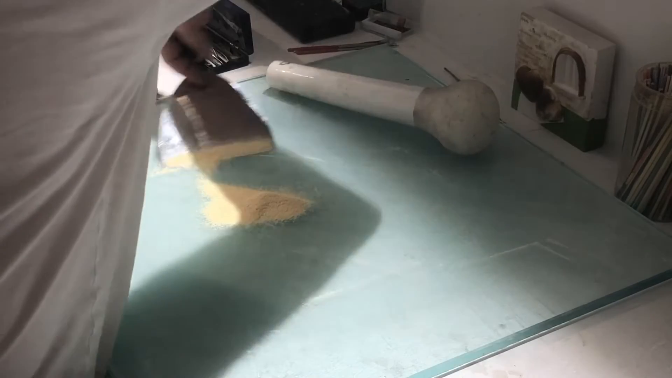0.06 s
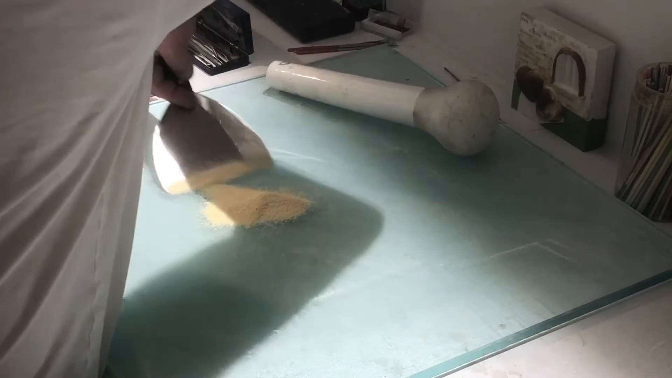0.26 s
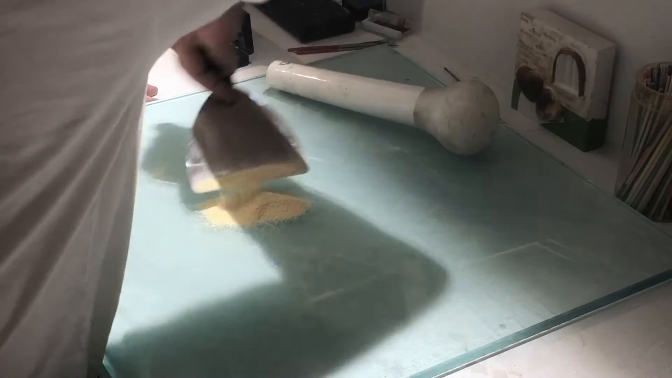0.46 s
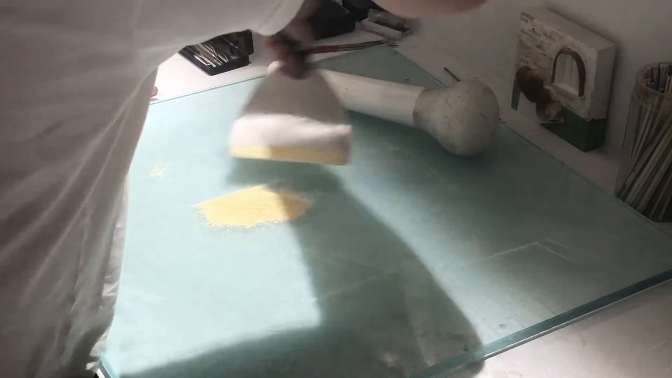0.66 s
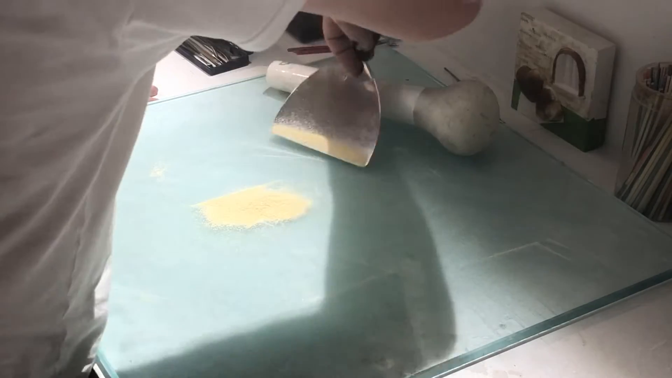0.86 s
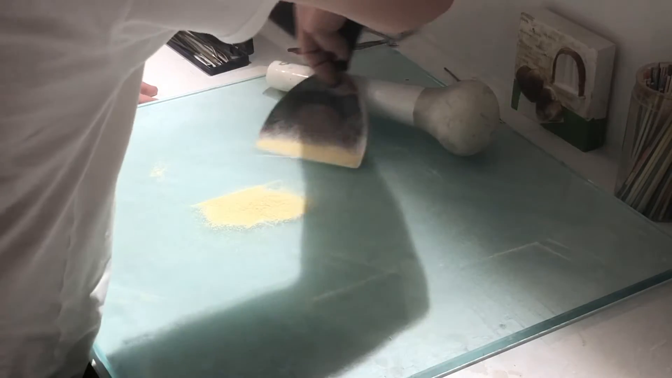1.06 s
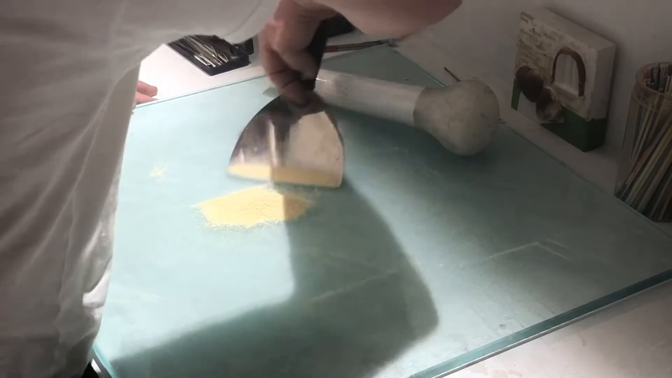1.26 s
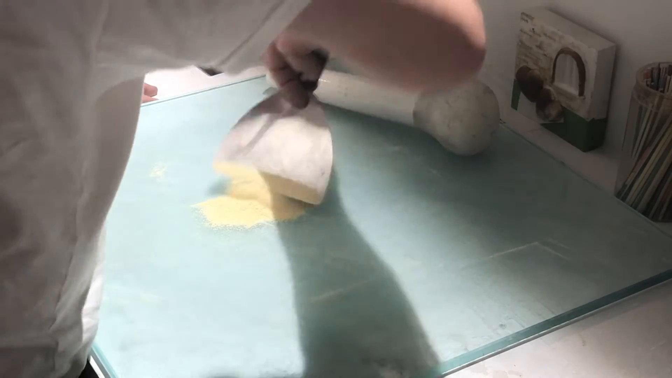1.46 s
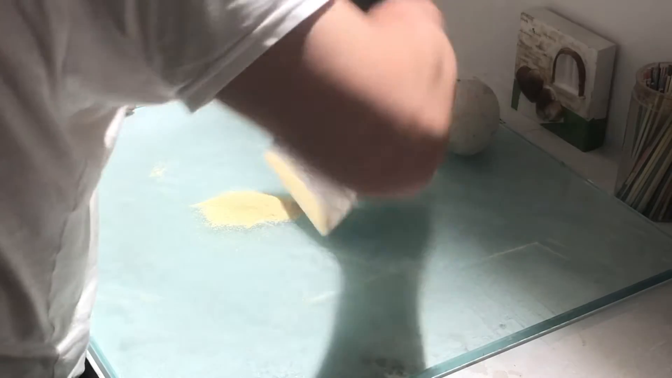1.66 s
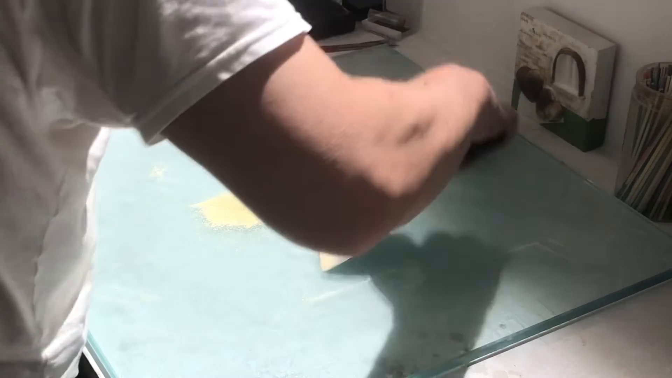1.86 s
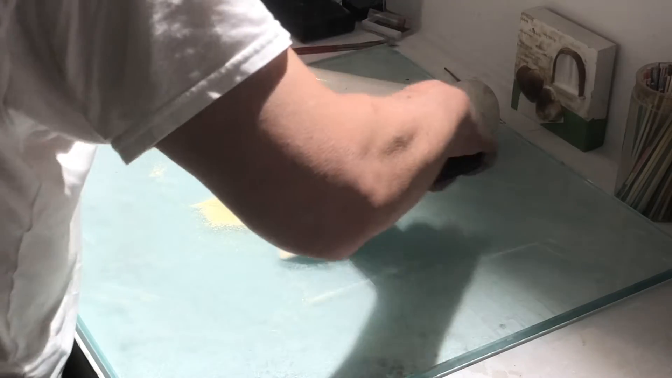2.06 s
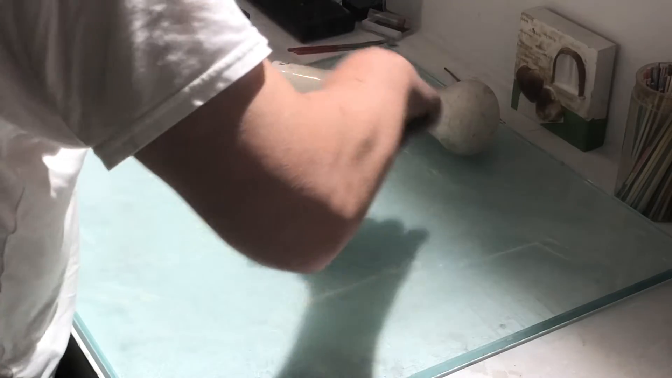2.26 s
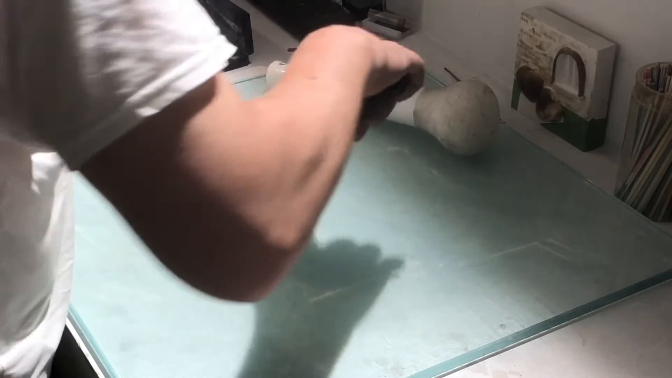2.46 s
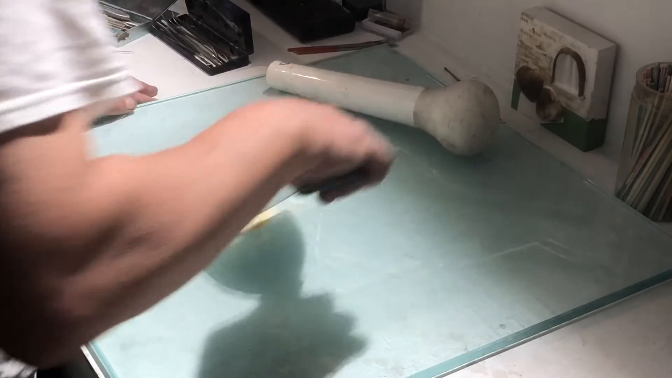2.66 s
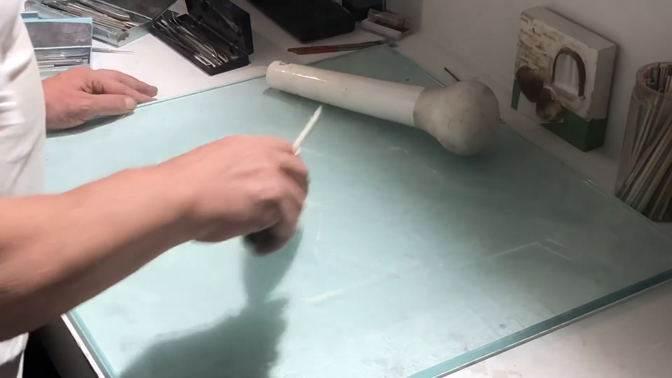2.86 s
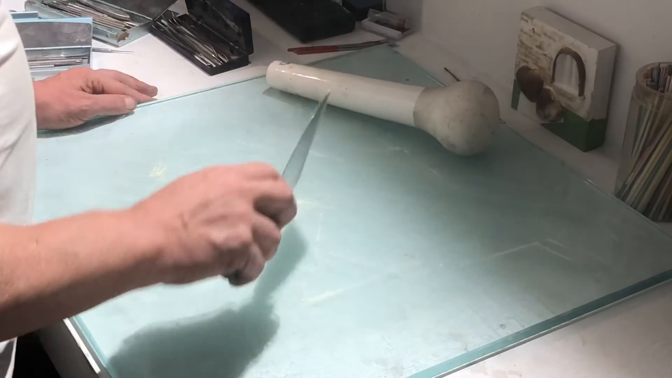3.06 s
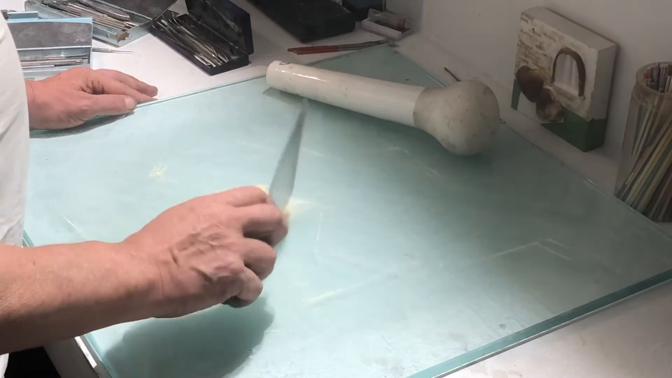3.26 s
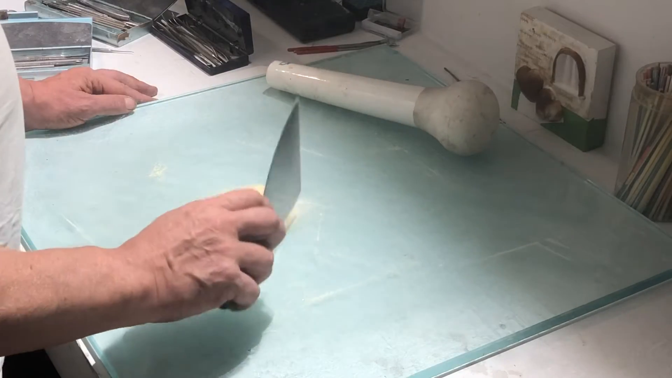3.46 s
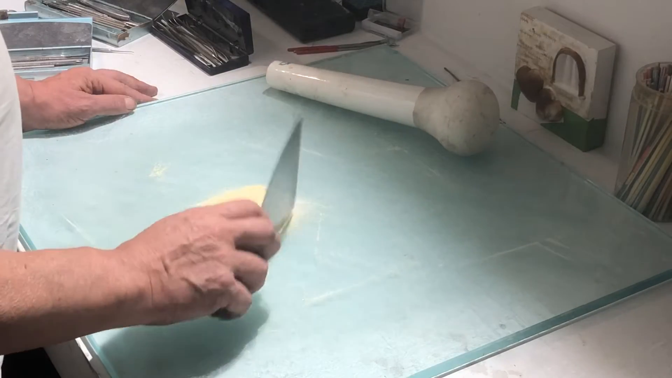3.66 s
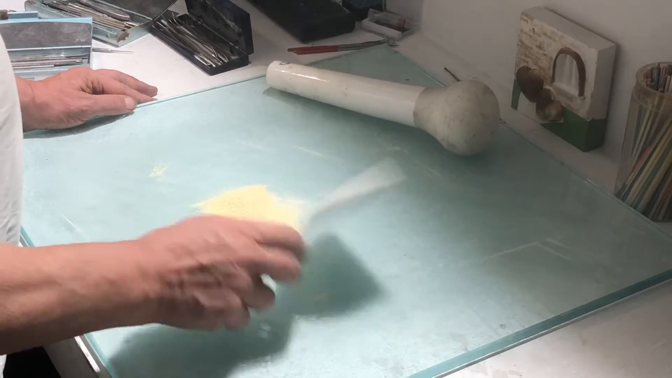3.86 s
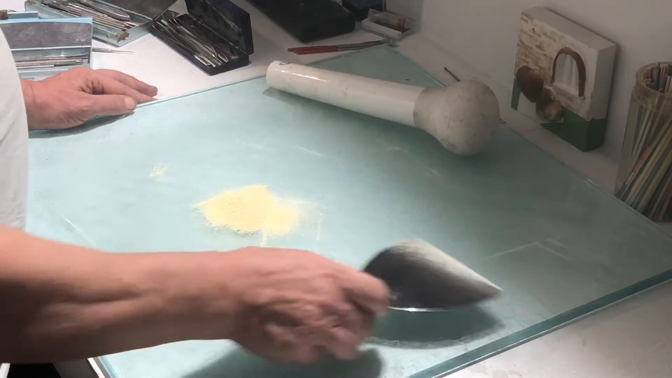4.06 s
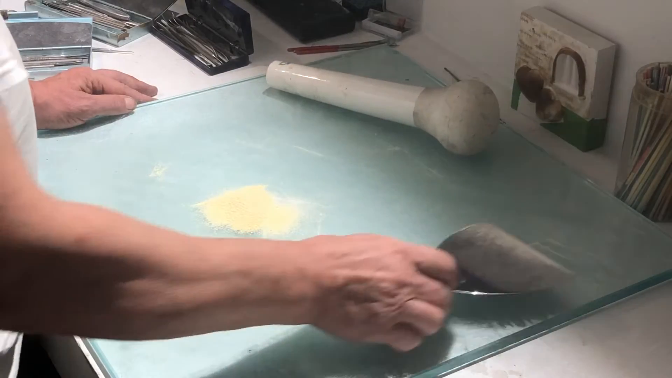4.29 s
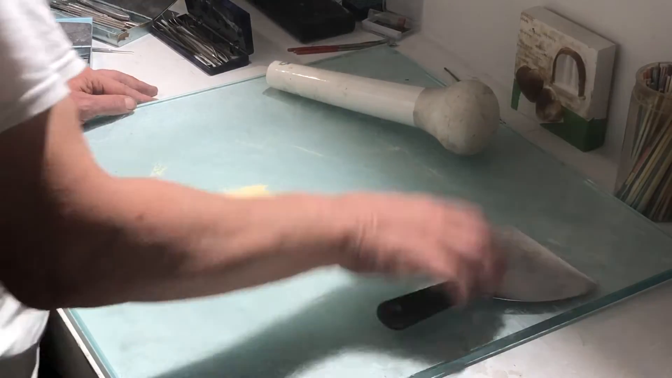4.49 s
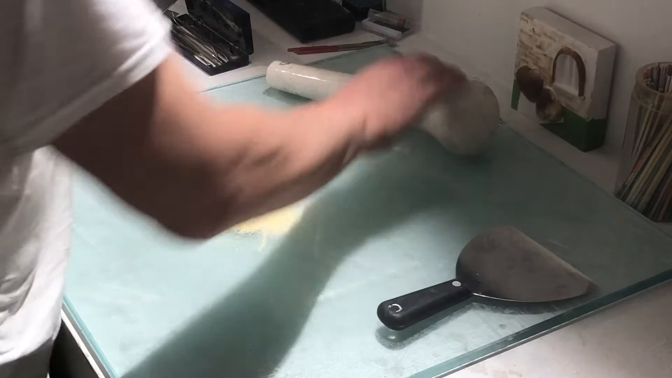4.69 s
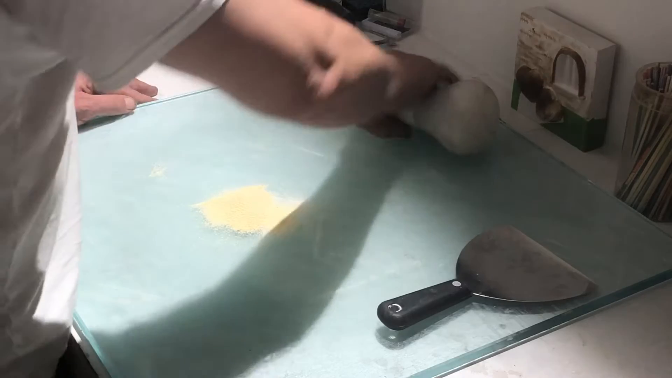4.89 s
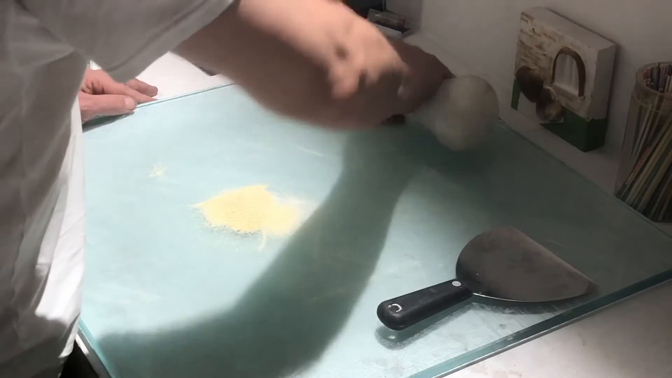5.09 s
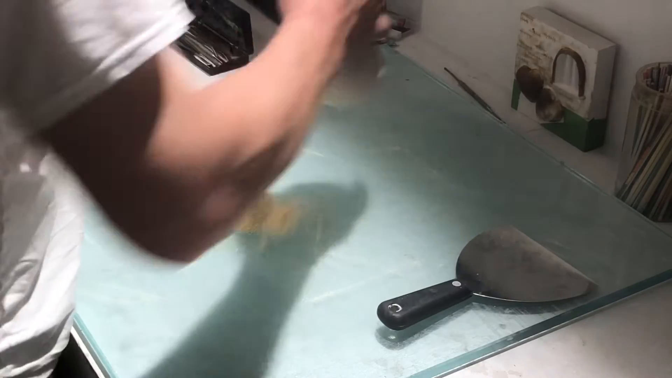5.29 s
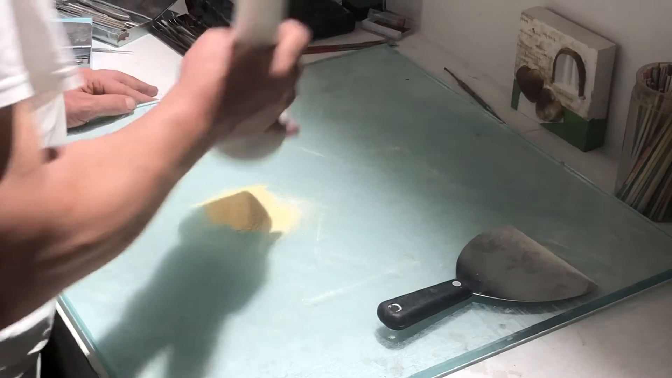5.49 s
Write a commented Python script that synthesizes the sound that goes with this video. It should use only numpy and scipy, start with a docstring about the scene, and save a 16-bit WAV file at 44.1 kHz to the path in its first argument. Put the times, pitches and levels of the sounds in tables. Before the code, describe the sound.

A steel scraper hisses powder across a glass slab in soft strokes, knocks sharply on it, then clatters down flat in a small humming room.

```python
"""Scraping powder on a glass slab

A steel scraper sweeps powder into a heap on a glass slab, in a small room with a fan running.
Its edge is tapped once and knocked twice to shed the powder; it is then laid flat with a short
clatter, and a pestle is lifted off with a soft bump. Fan and powder are coloured noise, the fan
with added tones. Glass, desk and steel are sets of fading sine tones, the glass and steel with
short noise bursts as well; the room adds a fading noise tail.
"""
import sys
import numpy as np
from scipy import signal
from scipy.fft import rfft, irfft, next_fast_len
from scipy.io import wavfile
from scipy.ndimage import map_coordinates

SR = 44100
rng = np.random.default_rng(int(sys.argv[2]) if len(sys.argv) > 2 else 0)


def file_out(sig):
    """Save sig as 16-bit WAV at sys.argv[1]."""
    # one column per channel
    cols = np.atleast_2d(sig).T
    # limit, then scale
    lim = np.clip(cols, -1, 1)
    pcm = np.round(lim * 32767).astype(np.int16)
    wavfile.write(sys.argv[1], SR, pcm)


N = 243873  # length of the scene in samples
T = np.arange(SR * 3 // 5) / SR  # time within one struck sound, in seconds


def amp(db):
    """Turn decibels into a gain."""
    return 10 ** (np.asarray(db) / 20)


def unit(x):
    """Scale a sound to rms 1."""
    return x / np.sqrt(np.mean(x ** 2) + 1e-20)


def along(points, hz):
    """Read (f/Hz, value) points at any frequency, with straight lines on a log axis."""
    point_hz, value = np.transpose(points)
    return np.interp(np.log(hz + 1), np.log(point_hz + 1), value)


def fade(t, t60):
    """Free decay: the sound falls 60 dB in t60 seconds."""
    return np.exp(-np.log(1000) * t / t60)


def rise_from_zero(rise_s):
    """A soft start: the sound grows smoothly instead of jumping in."""
    return 1 - np.exp(-T / rise_s)


def wobble(rate):
    """A smooth random curve through `rate` random points a second."""
    points = rng.standard_normal(int(N * rate / SR) + 4)
    return map_coordinates(points, [np.arange(N) * rate / SR])


def filtered(x, response):
    """Multiply the spectrum of x by a response of frequency."""
    size = next_fast_len(len(x) + SR // 4)
    spectrum = rfft(x, size) * response(np.fft.rfftfreq(size, 1 / SR))
    return irfft(spectrum, size)[:len(x)]


def noise(spectrum, size):
    """Noise of rms 1 with the given colour."""
    return unit(filtered(rng.standard_normal(size), lambda hz: amp(along(spectrum, hz))))


def add(track, s, sound):
    """Mix a sound into the track at time s."""
    part = track[round(s * SR):][:len(sound)]
    part += sound[:len(part)]


def ring(modes, scatter_db):
    """Tones of a struck body, set off together and fading, each at a slightly new strength."""
    hz, db, t60 = np.transpose(modes)[:, :, None]
    strength = amp(db + scatter_db * rng.standard_normal(hz.shape))
    return np.sum(strength * fade(T, t60) * np.sin(2 * np.pi * hz * T), axis=0)


def wash(spectrum, t60, rise):
    """The crowd of weak plate modes: it swells as bending waves spread, and dies fast."""
    return noise(spectrum, len(T)) * fade(T, t60) * rise_from_zero(rise)


# colour of the room's air noise: (f/Hz, relative level per Hz/dB)
AIR_COLOUR = [(15, -5), (33, -0.5), (75, -5.5), (125, -8), (175, -16.5), (240, -11.5), (400, -13.5),
              (560, -6), (800, -7), (1150, -11.5), (2600, -12.5), (3900, -21.5), (6000, -23.5), (8000, -31),
              (13000, -35), (15500, -40)]
# fan tones: (f/Hz, typical level/dB)
FAN_TONES = [(77, -82), (120, -80), (307, -85.5), (560, -83), (695, -83.5), (770, -79), (1594, -76)]


def fan():
    """Steady air noise with a few tones, slightly unsteady in level and phase."""
    t = np.arange(N) / SR
    tones = np.zeros(N)
    for hz, db in FAN_TONES:
        level = amp(db + 1.7 * wobble(3.93)) * np.sqrt(2)  # sqrt(2): dB counts rms, not peak
        tones += level * np.sin(2 * np.pi * hz * t + 0.84 * wobble(6.3))
    return amp(-64.0) * noise(AIR_COLOUR, N) + tones


# how long the room rings: (f/Hz, t60/s)
ROOM_DECAY = [(100, 0.42), (700, 0.61), (2500, 0.45), (6000, 0.43), (10000, 0.26), (15000, .2)]


def room_tail(spectrum):
    """Diffuse sound of the given colour: walls answer after a few milliseconds, treble dies early."""
    hz, t, z = signal.stft(noise(spectrum, len(T)), SR, nperseg=256)
    fading = z * fade(t, along(ROOM_DECAY, hz)[:, None])
    tail = signal.istft(fading, SR, nperseg=256)[1][:len(T)]
    return tail * (1 - np.exp(-(T / 0.0044) ** 2))


def room(x):
    """The room's answer to a small source: the sound smeared by an evenly coloured tail."""
    tail = room_tail([(1, 0)])
    return signal.fftconvolve(x, tail / np.linalg.norm(tail))[:N]


# tones of the desk: (f/Hz, relative level/dB, t60/s)
DESK_MODES = [(47.8, -14, 0.11), (75, -2, 0.22), (136.4, -4, 0.068), (174.5, 1.5, 0.054), (217.7, 2, 0.12),
              (246, 3.5, 0.095), (352.6, 4.5, 0.055)]


def desk():
    """The low thud of the desk under the slab."""
    return ring(DESK_MODES, scatter_db=.5) * rise_from_zero(.003)


def soft_thud(soft_hz):
    """A slow contact stirs only the lowest modes of the desk."""
    return signal.sosfilt(signal.butter(4, soft_hz, fs=SR, output="sos"), desk())


# the slab's strongest bending modes: (f/Hz, relative level/dB, t60/s)
GLASS_MODES = [(641.6, -11.5, 0.15), (988, -10.5, 0.073), (1216, -10, 0.051), (1624, -4.5, 0.037),
               (1649, 3, 0.04), (1798, -1.5, 0.074), (1998, -1, 0.07), (2017, -10.5, 0.055),
               (2370, 2.5, 0.026), (2376, 5.5, 0.017), (2560, -5.5, 0.036), (2830, 2, 0.038),
               (2997, -9, 0.085), (3210, -23.5, 0.069), (3244, 2.5, 0.033), (3530, 1.5, 0.051),
               (3665, 2.5, 0.04), (4140, -14, 0.084), (4200, -4.5, 0.077), (4340, 1.5, 0.057),
               (4530, -1.5, 0.073), (5000, -10, 0.072), (5420, -5, 0.065), (5850, -1, 0.081),
               (6550, -18.5, 0.12), (7000, -14, 0.2), (7300, -12.5, 0.065), (7680, -12, 0.06),
               (8580, -25, 0.064), (8790, -15, 0.083)]
# the crowd of weak modes of the glass: (f/Hz, relative level per Hz/dB)
GLASS_WASH_COLOUR = [(60, -15), (200, -13.5), (500, -16.5), (700, 0), (1400, -4), (2300, 4.5), (4500, 1),
                     (6200, -3), (8500, -5), (11000, -12.5), (15500, -39.5)]


def glass():
    """The slab, damped by the desk it lies on: strong tones plus a wash of weak ones."""
    modes = ring(GLASS_MODES, scatter_db=.5) * rise_from_zero(.002)
    return modes + amp(4.5) * wash(GLASS_WASH_COLOUR, t60=0.1, rise=0.0016)


# the steel blade: (f/Hz before detuning, t60/s before contact damping,
#                   relative level struck on its edge/dB, relative level struck on its face/dB)
BLADE_MODES = [(1610, 0.19, -5, -19), (2440, 0.58, -20, -14), (2740, 0.36, -15, -28),
               (3040, 0.0875, -28, 0), (3430, 0.656, -14, -16), (3350, 0.57, -13.5, -29),
               (3450, 0.31, -6, -14.5), (3730, 0.11, -5.5, -24), (4280, 0.32, -17, -28),
               (4420, 0.29, -16.5, -7), (4690, 0.47, -11.5, -14), (5070, 0.22, -10.5, -7.5),
               (5610, 0.52, -22, -14.5), (5720, 0.2, -3.5, -6.5), (6580, 0.14, 1, -8),
               (6720, 0.127, -26, -2), (7400, 0.47, -24, -23), (7700, 0.16, -33.5, -7),
               (9050, 0.092, -0.5, -29), (9470, 0.087, -2.5, -26), (9400, 0.1, -5, -18),
               (9440, .15, -25, -1), (9660, 0.1, -16.5, 1.5), (10600, .14, -16, -4), (11560, .13, -25, -3),
               (12505, 0.088, -5.5, -1), (13300, .15, -4, -22), (15080, 0.078, -12.5, -20)]


def blade(on_edge, sustain, detune):
    """The ring of the steel: where it is struck picks the modes, and contact damps and shifts them."""
    hz, t60, edge_db, face_db = np.transpose(BLADE_MODES)
    hz = hz * (1 + detune * rng.standard_normal(len(hz)))
    modes = np.transpose([hz, edge_db if on_edge else face_db, sustain * t60])
    return ring(modes, scatter_db=1) * rise_from_zero(.001)


# light touches of steel or pestle: (t/s, tick level/dB, glass level/dB)
LIGHT_TOUCHES = [(0.917, -65, -80), (.949, -66, -87), (1.186, -52, -83), (1.849, -60, -67),
                 (1.933, -58, -71.5), (2.781, -76, -72.5), (4.893, -67, -88), (4.978, -69, -68.5)]
# the pestle rocks the desk as it is lifted: (t/s, level/dB)
PESTLE_BUMPS = [(4.915, -48), (4.941, -54), (4.989, -50), (5.051, -53.5)]


def handling():
    """Tiny bright ticks on the glass, and the soft bumps of the pestle on the desk."""
    out = np.zeros(N)
    for s, tick_db, glass_db in LIGHT_TOUCHES:
        tick = wash(POWDER_COLOUR, t60=0.05, rise=.001)
        add(out, s, amp(tick_db) * tick + amp(glass_db) * glass())
    for s, db in PESTLE_BUMPS:
        add(out, s, amp(db) * soft_thud(soft_hz=104))
    return out


# the blade propped on one corner: (f/Hz, relative level/dB, t60/s)
CORNER_MODES = [(2970, -1, 0.16), (3360, -3, .07), (4200, -9, .08), (5520, -12, 0.43), (6705, -9, 0.22),
                (9620, -11, .15), (10575, -8, 0.2), (14330, -9, .12)]
# weak modes of the propped blade: (f/Hz, relative level per Hz/dB)
CORNER_WASH_COLOUR = [(1500, -10), (2900, 0), (4500, -2.5), (8000, -9), (11000, -8), (15500, -9)]


def corner_clink():
    """One corner touches the slab: a few steel tones over a short wash."""
    tones = ring(CORNER_MODES, scatter_db=3)
    return tones + amp(5) * wash(CORNER_WASH_COLOUR, t60=0.077, rise=.0005)


# light clinks of that corner: (t/s, level/dB)
CORNER_CLINKS = [(4.3668, -59), (4.372, -57.5), (4.398, -61.5)]
# the scraper laid flat, first its landing and then its rattle: (t/s, blade level/dB)
CLATTER_HITS = [(4.4425, -48.5), (4.455, -40.5), (4.462, -39), (4.476, -55), (4.488, -46.5), (4.513, -53),
                (4.590, -69)]
# the crowd of weak modes of the steel: (f/Hz, relative level per Hz/dB)
STEEL_WASH_COLOUR = [(200, -14.5), (700, 0.5), (1500, 0.5), (3000, 0), (6000, -4.5), (10000, -1),
                     (15500, -2.5)]
LANDING_GLASS_DB, RATTLE_GLASS_DB = -43, -66  # only the landing strikes the slab hard
SETTLE_DESK_DB, SETTLE_DB_PER_S = -52, 55  # the thud of the desk fades as the scraper settles


def laying_down():
    """One corner clinks on the slab, then the blade slaps the glass and rattles to rest."""
    out, landing_s = np.zeros(N), CLATTER_HITS[0][0]
    for s, db in CORNER_CLINKS:
        add(out, s, amp(db) * corner_clink())
    for s, blade_db in CLATTER_HITS:
        glass_db = LANDING_GLASS_DB if s == landing_s else RATTLE_GLASS_DB
        desk_db = SETTLE_DESK_DB - SETTLE_DB_PER_S * (s - landing_s)
        steel = blade(on_edge=False, sustain=0.57, detune=0.00297)
        steel = steel + amp(1.5) * wash(STEEL_WASH_COLOUR, t60=0.14, rise=0.00035)
        add(out, s, amp(blade_db) * steel)
        add(out, s, amp(glass_db) * glass())
        add(out, s, amp(desk_db) * soft_thud(soft_hz=196))
    return out


# edge-on knocks: (t/s, glass level/dB, steel crack level/dB, blade ring level/dB, desk level/dB)
EDGE_KNOCKS = [(3.1701, -41, -27.5, -36.5, -46), (3.4114, -24, -32, -61, -44),
               (3.6594, -24.5, -33, -47, -43.5)]


def slab_knocks():
    """The edge lands on one spot, so the slab answers alike; its wide face fills the room evenly."""
    out, slab, thud = np.zeros(N), glass(), desk()
    for s, glass_db, _, _, desk_db in EDGE_KNOCKS:
        slab_in_room = slab + amp(-17.0) * room_tail(GLASS_WASH_COLOUR)
        add(out, s, amp(glass_db) * slab_in_room + amp(desk_db) * thud)
    return out + amp(-18) * room(out)  # the strongest modes linger between the walls


def blade_knocks():
    """The steel cracks at each knock; a light tap leaves it free to ring."""
    out = np.zeros(N)
    for s, _, crack_db, ring_db, _ in EDGE_KNOCKS:
        crack = wash(STEEL_WASH_COLOUR, t60=0.12, rise=0.00054)
        steel = blade(on_edge=True, sustain=0.97, detune=0)
        add(out, s, amp(crack_db) * crack + amp(ring_db) * steel)
    return out


# the blade pressed on the glass: (f/Hz, width/Hz, relative level/dB)
CHATTER_MODES = [(1624, 41, 0), (2030, 47, -16.5), (2612, 28, -4), (3370, 31, -12), (3790, 55, -15.5)]


def chatter_response(hz):
    """Resonances of the pressed blade, with signs that alternate from one to the next."""
    total = 0
    for k, (center, width, db) in enumerate(CHATTER_MODES):
        damping = 1j * hz * width
        total = total + (-1) ** k * amp(db) * damping / (center ** 2 - hz ** 2 + damping)
    return total


# sweeps of the edge over the glass: (t at full speed/s, speed-up/s, slow-down/s,
#     powder hiss level/dB, edge rub level/dB, blade chatter level/dB), levels at full speed
SWEEPS = [(.05, 0.17, .22, -66.5, -83, -71), (.325, 0.25, 0.085, -62, -66, -61.5),
          (1.195, .135, 0.2, -56, -63, -81), (1.865, 0.027, 0.17, -73, -74, -77),
          (2.075, 0.13, 0.12, -62, -62, -65)]
# colour of the powder hiss: (f/Hz, relative level per Hz/dB)
POWDER_COLOUR = [(2500, -19), (5000, -4.5), (7500, -5), (11500, -1.5), (15500, -2.5)]
# colour of the edge rubbing on glass: (f/Hz, relative level per Hz/dB)
RUB_COLOUR = [(500, -40), (1100, -17), (1800, -1), (3000, -0.5), (4500, -8), (7000, -13.5), (12000, -34)]
STROKE_RANGE_DB = 22  # fall of the hiss from full speed to either end of a sweep
STROKE_SHAPE = 1.18  # 1 = pointed, 2 = rounded
RUB_FOLLOWS, CHATTER_FOLLOWS = 0.62, 0.97  # dB for each dB of hiss
# the last sweep trails off in a light drag that only makes the blade sing
DRAG_START_S, DRAG_END_S, DRAG_FADE_S, DRAG_DB = 2.22, 2.7, .06, -76.5


def sweeps():
    """Each sweep speeds up and slows down: grains hiss, the edge rubs the glass, the blade chatters."""
    t = np.arange(N) / SR
    hiss, rub, press = np.zeros((3, N))  # loudness curves
    for s, up_s, down_s, hiss_db, rub_db, chatter_db in SWEEPS:
        from_peak = np.maximum((s - t) / up_s, (t - s) / down_s)  # 0 at full speed, 1 at either end
        speed_db = -STROKE_RANGE_DB * from_peak ** STROKE_SHAPE
        hiss += amp(hiss_db + speed_db)
        rub += amp(rub_db + RUB_FOLLOWS * speed_db)
        press += amp(chatter_db + CHATTER_FOLLOWS * speed_db)
    drag_edges = np.minimum(t - DRAG_START_S, DRAG_END_S - t) / DRAG_FADE_S
    press += amp(DRAG_DB) * np.clip(drag_edges, 0, 1)

    grit = unit(amp(1.06 * wobble(70) + 1.6 * wobble(900)))  # clumps and single grains
    scrape = grit * (hiss * noise(POWDER_COLOUR, N) + rub * noise(RUB_COLOUR, N))
    chatter = unit(filtered(rng.standard_normal(N), chatter_response))
    return scrape + press * chatter


def scene():
    """Work on the slab, its room sound and the fan."""
    work = sweeps() + blade_knocks() + laying_down() + handling()
    return (work + amp(-12) * room(work) + slab_knocks() + fan())[None]


TOP_HZ = 15900  # the sound stops steeply above this


def top_cut(hz):
    """A very steep cut of the highest treble."""
    return 1 / np.sqrt(1 + (hz / TOP_HZ) ** 200)


def record(dry):
    """Keep almost nothing above the top of the band."""
    return np.array([filtered(channel, top_cut) for channel in dry])


dry = scene()
out = record(dry)
file_out(out)
```